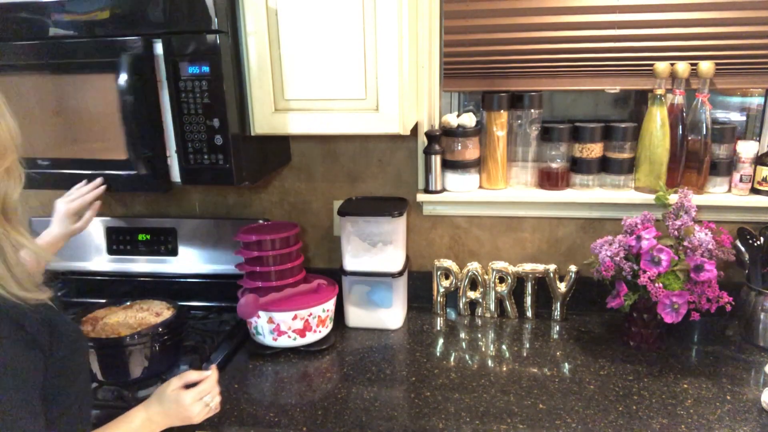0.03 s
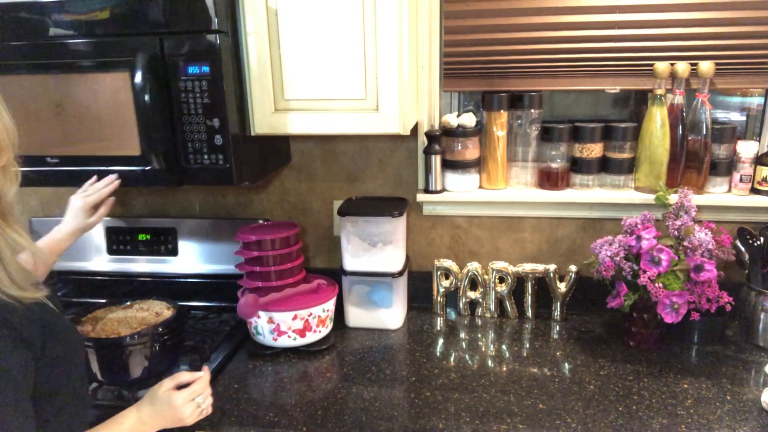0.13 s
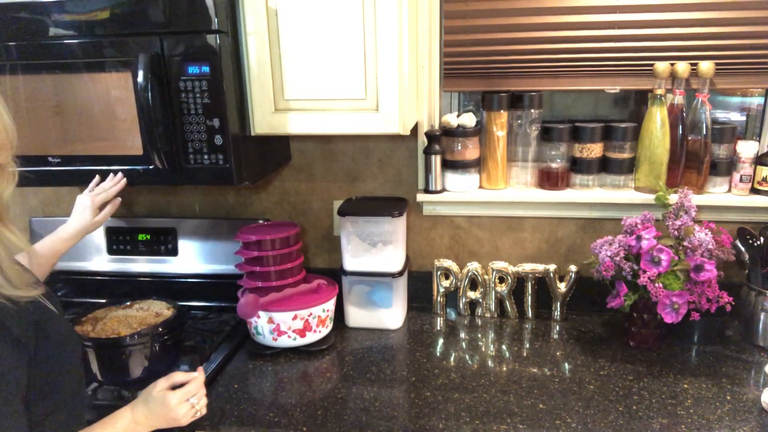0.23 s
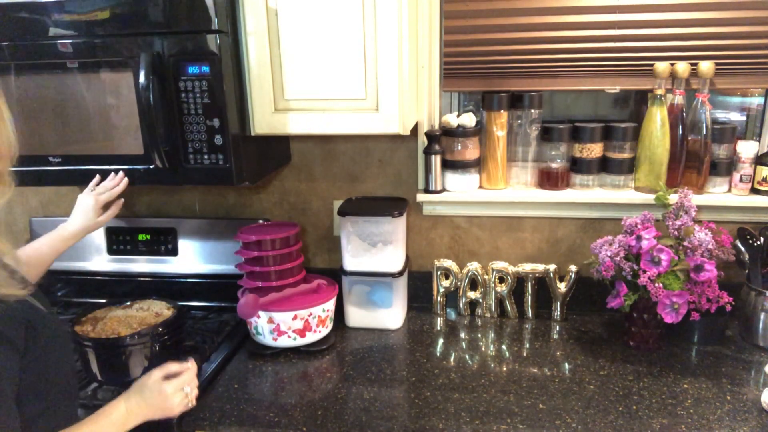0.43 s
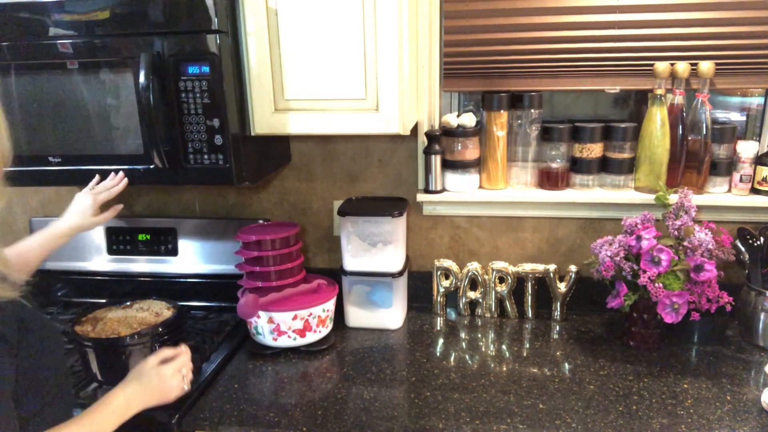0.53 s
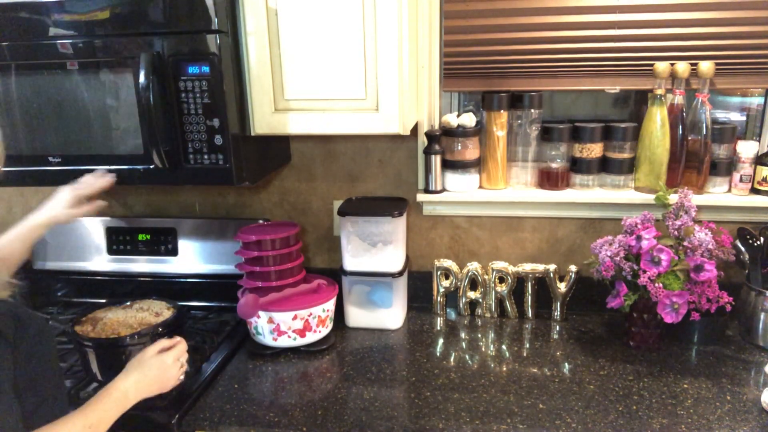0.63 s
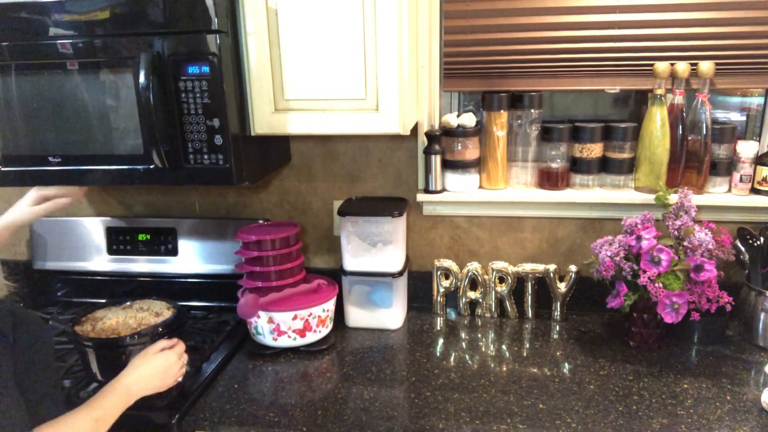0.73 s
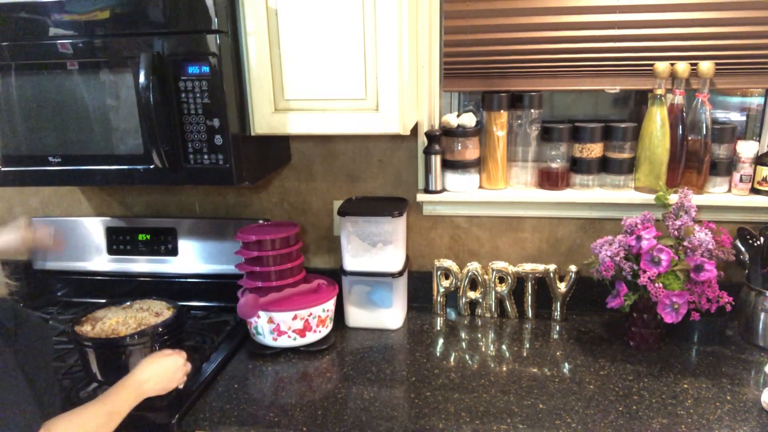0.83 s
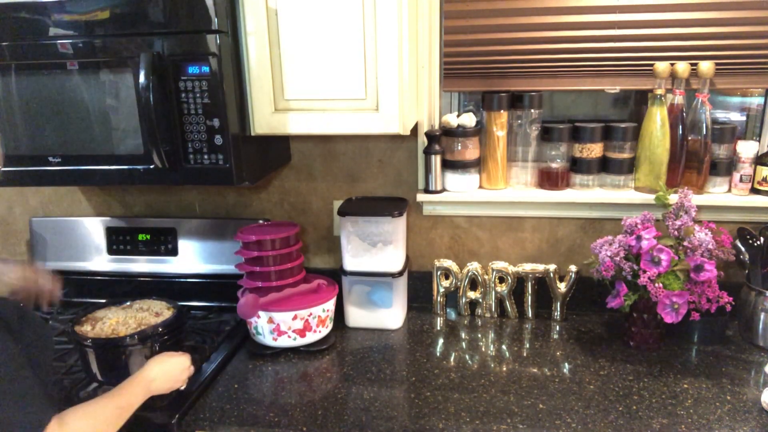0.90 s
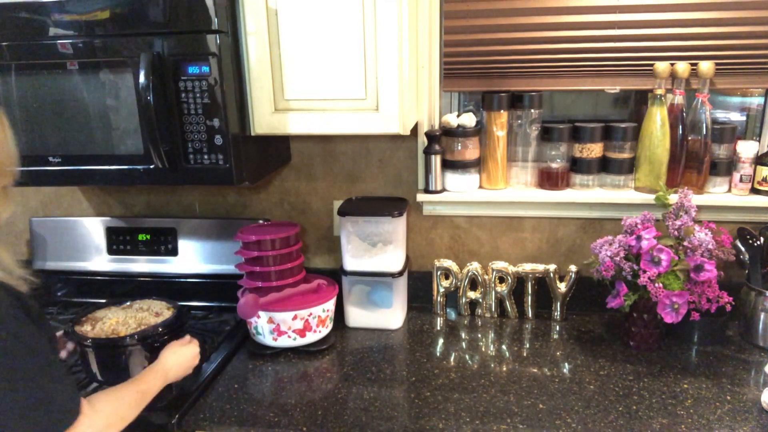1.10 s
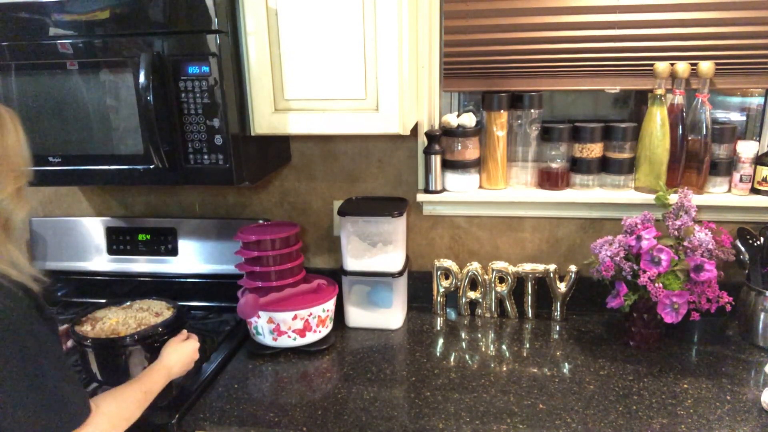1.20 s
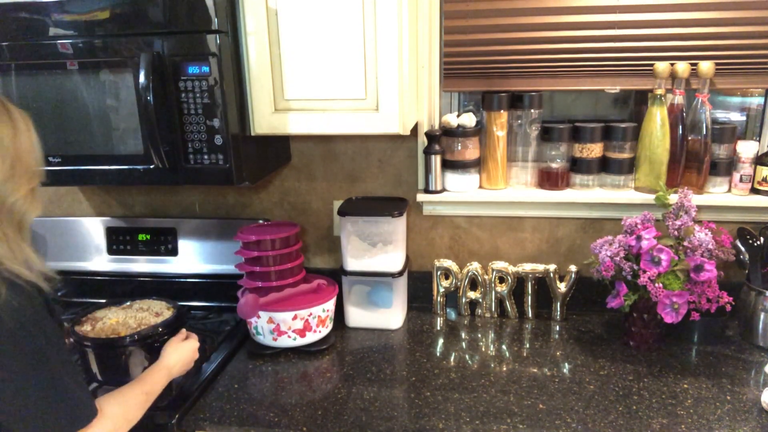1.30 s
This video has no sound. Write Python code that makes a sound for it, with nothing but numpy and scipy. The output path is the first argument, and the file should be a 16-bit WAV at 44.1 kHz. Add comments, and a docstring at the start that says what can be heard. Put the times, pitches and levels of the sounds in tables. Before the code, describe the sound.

A microwave door is pushed shut with two quick hollow knocks in a quiet kitchen.

```python
"""In a quiet kitchen a microwave door is pushed shut: latch hooks strike and scrape their catches and snap in,
then the door slaps its frame and the hollow cabinet booms. Contacts are bursts of random impulses, band-limited
by hardness, that excite decaying door modes and a diffuse field from the hard walls; the boom is a set of softly
driven low modes. Bright ticks and a late rustle are shaped noise, over air noise, hum and faint appliance tones."""
import sys
import numpy as np
from scipy import signal
from scipy.fft import rfft, irfft, next_fast_len
from scipy.io import wavfile

SR = 44100
rng = np.random.default_rng(int(sys.argv[2]) if len(sys.argv) > 2 else 0)


def invert_db(level):
    """Linear amplitude ratio for a level in decibels (20 dB per decade), elementwise."""
    return 10 ** (np.asarray(level, dtype=float) / 20)


def dump(signal):
    """Clip the signal to [-1, 1] and save it as 16-bit WAV at the path in sys.argv[1]."""
    limited = np.clip(np.atleast_2d(signal).T, -1, 1)
    pcm = np.round(limited * 32767).astype(np.int16)
    wavfile.write(sys.argv[1], SR, pcm)


N = 59535
T = np.arange(N) / SR  # time axis, s

# Latch and frame contacts: start_s, level_db, rattle_length_s, low_edge_hz, high_edge_hz, treble_share_db
LATCH_CONTACTS = [(.2032, -36, 0.018, 1530, 3340, -25), (.2125, -35.5, 0.035, 504, 4450, -55),
                  (.21, -40, 0.031, 113, 503, -18), (.2607, -37, 0.0042, 2500, 5700, -23),
                  (.2632, -21, .0006, 400, 1500, -30), (0.2659, -36.5, 0.023, 540, 2050, -28),
                  (.3885, -48.5, 0.066, 2320, 5560, -9.5), (0.377, -51, 0.032, 99, 308, -50),
                  (.405, -37, 0.0048, 148, 505, -36), (.4128, -30, 0.0097, 650, 2720, -30),
                  (.4135, -44, 0.044, 3380, 7200, -15), (0.4232, -28.5, 0.0093, 830, 3060, -22),
                  (.4275, -32.5, 0.021, 154, 960, -24)]
RATTLE_PER_S, SPREAD_DB = 9000, 3  # mean impact rate, standard deviation of impact level
RISE_S = 0.0017  # a contact closes over this time
# Door and casing modes: pitch_hz, relative_level_db, t60_s
DOOR_MODES = [(195, 4, 0.074), (247, -1, 0.098), (316.4, -1, 0.089), (353.5, -0.5, 0.078), (499, 6, 0.041),
              (607, 4.5, 0.036), (879.6, 1.5, 0.061), (970, 2.5, 0.029), (1463, -15.5, 0.025),
              (1780, -26, .03), (2410, -0.5, 0.0083), (2450, -27, 0.013), (3050, 6.5, 0.0067),
              (4920, 3.5, 0.0033)]
RING_DB = -7  # door ringing relative to the contact

# Soft pushes that make the cabinet boom: start_s, level_db, rise_s
CABINET_PUSHES = [(0.212, -56, 0.053), (0.374, -48.5, 0.016), (0.442, -38, 0.0186)]
# Cabinet modes: pitch_hz, level_re_push_db, t60_s
CABINET_MODES = [(52.7, -20, 0.45), (60.8, 5, 0.35), (99.3, 0, 0.32), (136.5, -3, 0.12)]

# Bright dry ticks and fizzes: start_s, peak_db (envelope before the high-pass), decay_s
BRIGHT_TICKS = [(.2615, -46, .02), (.3885, -38, .009), (.5305, -37, .0022), (1.1505, -50, .001),
                (1.2605, -56, .002)]
TICK_HZ = 10500  # high-pass corner
# Rustle spectrum: frequency_hz, relative_density_db (per Hz)
RUSTLE_SPECTRUM = [(470, -40), (800, -11.5), (2440, -9.5), (2870, -8.5), (4180, -14.5), (6090, -12),
                   (16000, -9)]
RUSTLE_S, RUSTLE_DB, RUSTLE_RISE_S = 1.334, -50.5, 0.01  # onset, rms level once risen, rise time

# Reverberation of the kitchen: frequency_hz, t60_s
KITCHEN_DECAY = [(60, 1), (180, 0.58), (330, 0.36), (510, 0.45), (1000, 0.38), (2000, 0.37), (4000, 0.34),
                 (8000, .3), (14000, 0.34)]
WET_DB, WALL_S, BUILD_S = -3, 0.0013, 0.0063  # reverberant level, first delay, build-up time

# Air noise spectrum: frequency_hz, relative_density_db (per Hz)
AIR_SPECTRUM = [(15, -66), (35, -24), (60, -19), (87, -12), (130, -13.5), (260, -5), (420, -11.5),
                (800, -17.5), (1100, -22.5), (4500, -29.5), (7500, -30), (10000, -29.5), (16000, -24.5)]
# Air noise level over time: time_s, relative_level_db (AIR_OVER_DB is added)
AIR_LEVEL = [(0.85, -76), (1.134, -74.5), (1.32, -75.5)]
AIR_OVER_DB = 12
# Wavering appliance tones: pitch_hz, rms_level_db, waver_width_hz (offset where amplitude halves)
APPLIANCE_TONES = [(131, -70.5, 10), (254, -68.5, 3.3), (765, -78, 3)]
MAINS_HZ, MAINS_DB = 59.5, -67  # steady hum: pitch, peak level

# Microphone colour: frequency_hz, gain_db
MIC_RESPONSE = [(30, 1.5), (100, -3.5), (6000, 1.5), (9500, -6), (14000, -10), (16000, -12)]
TOP_HZ = 15900  # upper band limit


def unit(x):
    """Normalization: scale to rms 1."""
    return x / np.sqrt(np.mean(x ** 2) + 1e-20)


def along(points, hz):
    """Interpolation of (frequency_hz, value) points on a logarithmic frequency axis."""
    f, v = np.transpose(points)
    return np.interp(np.log(hz + 1), np.log(f + 1), v)


def filtered(x, response):
    """Linear filtering: the spectrum is multiplied by a complex response of frequency."""
    m = next_fast_len(N + SR // 2)  # zero padding keeps tails from wrapping round
    return irfft(rfft(x, m) * response(np.fft.rfftfreq(m, 1 / SR)), m)[:N]


def high_pass(f, corner_hz):
    """Two cascaded first-order high-pass sections."""
    ratio = 1j * f / corner_hz
    return (ratio / (1 + ratio)) ** 2


def hiss(spectrum):
    """Spectral shaping: white noise coloured by a spectrum, at rms 1."""
    return unit(filtered(rng.standard_normal(N), lambda hz: invert_db(along(spectrum, hz))))


def latch():
    """Impact excitation: bursts of tiny impacts, banded by contact hardness, drive the door and the walls."""
    out = np.zeros(N)
    for start, level_db, length, low_hz, high_hz, treble_db in LATCH_CONTACTS:
        struck = rng.random(N) < RATTLE_PER_S / SR
        struck[round((start + RISE_S) * SR)] = True  # at least one impact, once closed
        polarity = rng.choice([-1, 1], N)
        strength = invert_db(SPREAD_DB * rng.standard_normal(N))
        closing = np.clip((T - start) / RISE_S, 0, 1)
        fading = np.exp(-((T - start) / length) ** 2)
        impacts = struck * polarity * strength * closing * fading

        def hardness(f):
            """Low-pass cutoff set by contact stiffness, with a share of treble passing it."""
            r = f / high_hz
            low_pass = 1 / (1 + 1j * np.sqrt(2) * r - r ** 2) ** 2
            return high_pass(f, low_hz) * (low_pass + invert_db(treble_db))

        hit = filtered(impacts, hardness)
        # energy set so that level_db is the rms over the rattle length
        hit = invert_db(level_db) * hit / np.linalg.norm(hit) * np.sqrt(length * SR)
        ringing = signal.fftconvolve(hit, ring(DOOR_MODES))[:N]
        near = hit + invert_db(RING_DB) * ringing
        out += near + invert_db(WET_DB) * kitchen(near)
    return out


def ring(modes):
    """Modal superposition: unit-energy impulse response of decaying sines with alternating sign."""
    t = T[:SR // 2]
    response = np.zeros(len(t))
    for k, (hz, level_db, t60) in enumerate(modes):
        response += (-1) ** k * invert_db(level_db - 60 * t / t60) * np.sin(2 * np.pi * hz * t)
    return response / np.linalg.norm(response)


def cabinet():
    """Soft modal excitation: the door's air cushion and weight set the low modes going gradually."""
    out = np.zeros(N)
    for start, push_db, rise in CABINET_PUSHES:
        t = np.clip(T - start, 0, None)
        for hz, mode_db, t60 in CABINET_MODES:
            decay = invert_db(push_db + mode_db - 60 * t / t60)
            out += decay * (1 - np.exp(-t / rise)) * np.sin(2 * np.pi * hz * t)
    return out


def ticks():
    """Transient noise: abrupt onsets with exponential decay, high-passed to sound bright and dry."""
    envelope = np.zeros(N)
    for start, peak_db, decay in BRIGHT_TICKS:
        envelope += invert_db(peak_db) * (T > start) * np.exp(-np.abs(T - start) / decay)
    return filtered(envelope * rng.standard_normal(N), lambda f: high_pass(f, TICK_HZ))


def rustle():
    """Friction-like broadband noise: a coloured hiss that sets in late with a linear rise."""
    rise = np.clip((T - RUSTLE_S) / RUSTLE_RISE_S, 0, 1)
    return invert_db(RUSTLE_DB) * rise * hiss(RUSTLE_SPECTRUM)


def kitchen(x):
    """Diffuse reverberation: a fresh noise tail builds up quickly, each frequency dying at its own rate."""
    hz, t, z = signal.stft(rng.standard_normal(SR), SR, nperseg=256)
    decay = invert_db(-60 * t / along(KITCHEN_DECAY, hz)[:, None])
    tail = signal.istft(z * decay, SR, nperseg=256)[1]
    tail = tail * np.clip((np.arange(len(tail)) / SR - WALL_S) / BUILD_S, 0, 1)
    return signal.fftconvolve(x, tail / np.linalg.norm(tail))[:N]


def appliances():
    """Narrow-band noise: resonant filtering of white noise gives wavering tones."""
    out = np.zeros(N)
    for pitch, level_db, width in APPLIANCE_TONES:
        tone = filtered(rng.standard_normal(N), lambda f: 1 / (1 + ((f - pitch) / width) ** 2))
        out += invert_db(level_db) * unit(tone)
    return out


def mains_hum():
    """Simple harmonic oscillation: one steady low sine."""
    return invert_db(MAINS_DB) * np.sin(2 * np.pi * MAINS_HZ * T)


def air():
    """Stationary-spectrum noise: coloured room hiss whose level drifts slightly."""
    time, level_db = np.transpose(AIR_LEVEL)
    return invert_db(AIR_OVER_DB + np.interp(T, time, level_db)) * hiss(AIR_SPECTRUM)


def scene():
    """Linear superposition of door, cabinet, small sounds and the quiet room, on one channel."""
    door = latch() + cabinet()
    small_sounds = ticks() + rustle()
    room_tone = appliances() + mains_hum() + air()
    return (door + small_sounds + room_tone)[None]


def top_cut(x):
    """Nothing passes above the cut-off."""
    return signal.sosfilt(signal.butter(12, 16470, fs=SR, output="sos"), x)


def record(dry):
    """Frequency response of the microphone, with a sharp upper band limit."""
    mix = filtered(dry[0], lambda hz: invert_db(along(MIC_RESPONSE, hz)) * (hz < TOP_HZ))[None]
    return top_cut(mix)


dry = scene()
out = record(dry)
dump(out)
```